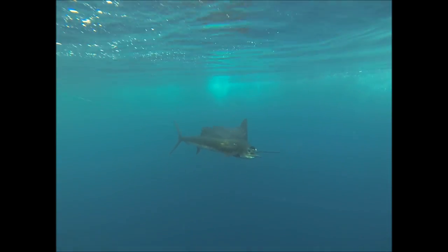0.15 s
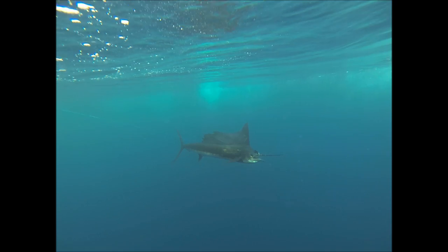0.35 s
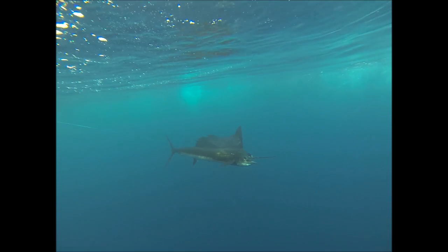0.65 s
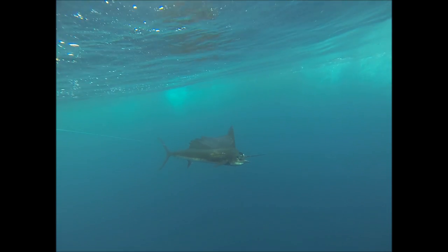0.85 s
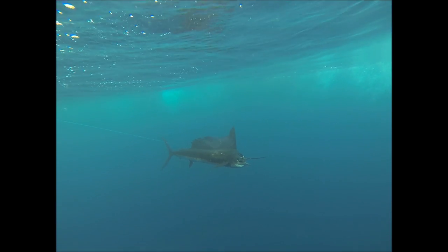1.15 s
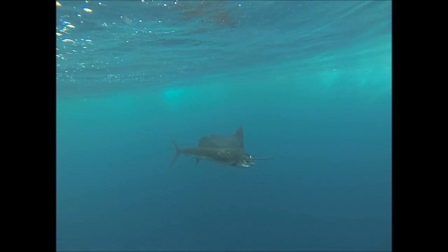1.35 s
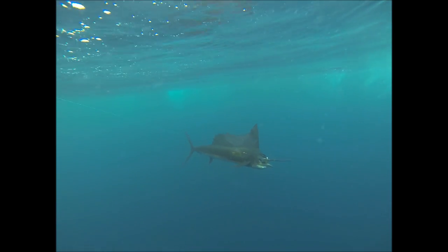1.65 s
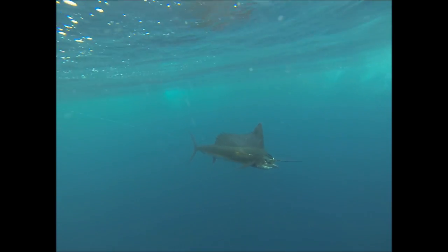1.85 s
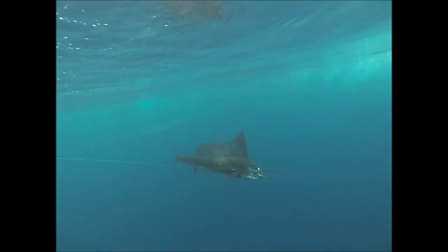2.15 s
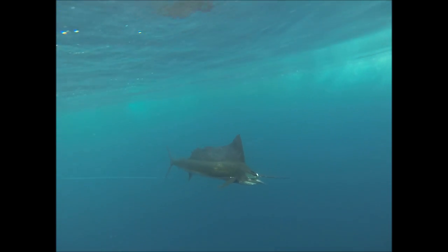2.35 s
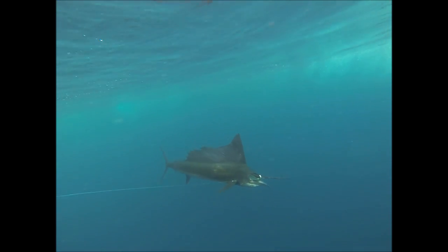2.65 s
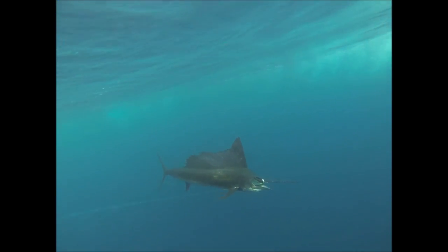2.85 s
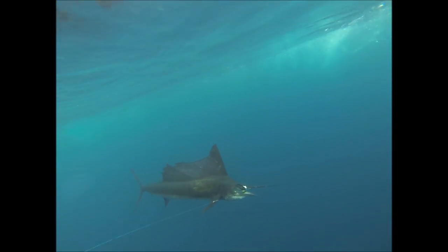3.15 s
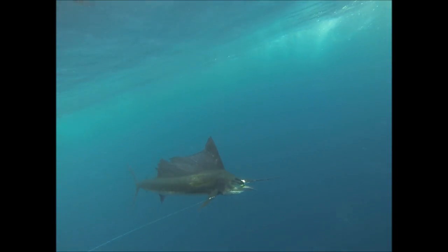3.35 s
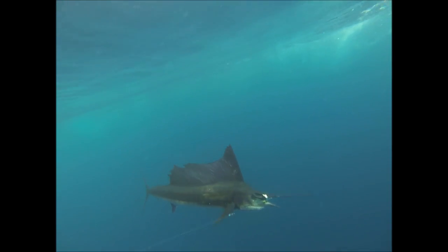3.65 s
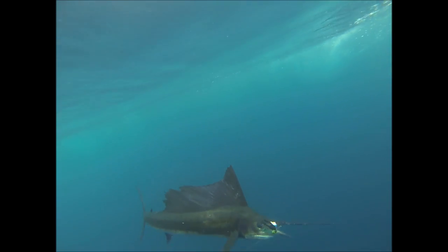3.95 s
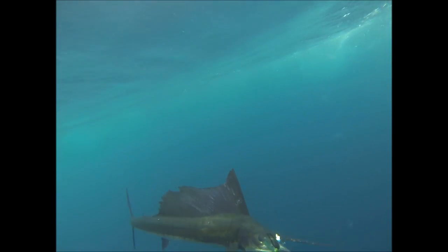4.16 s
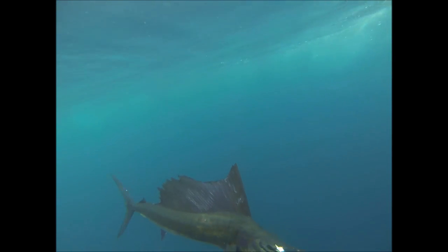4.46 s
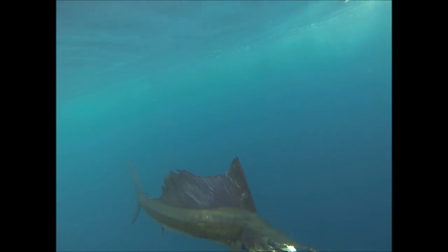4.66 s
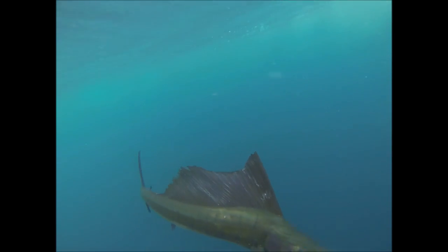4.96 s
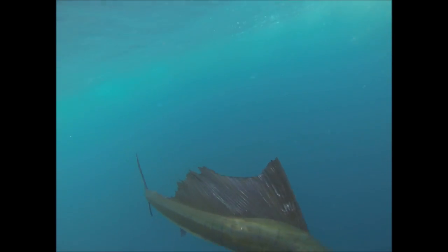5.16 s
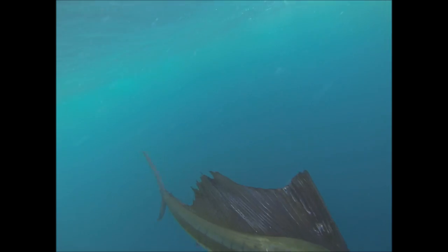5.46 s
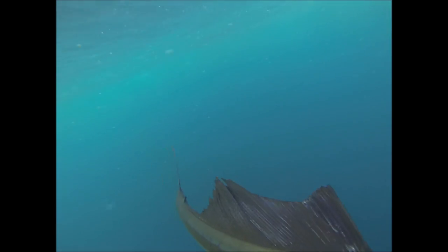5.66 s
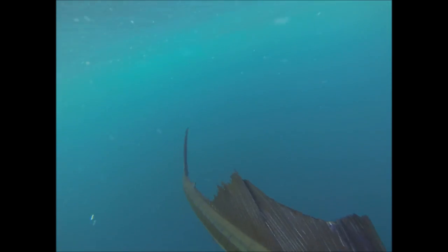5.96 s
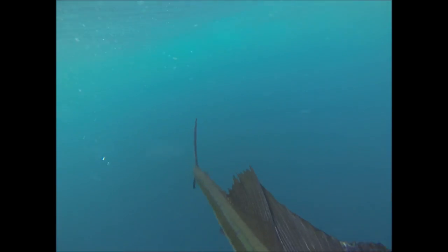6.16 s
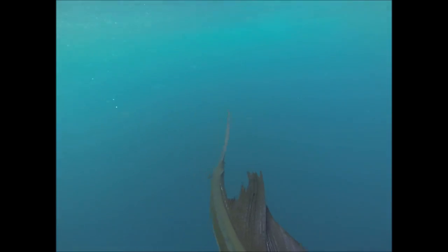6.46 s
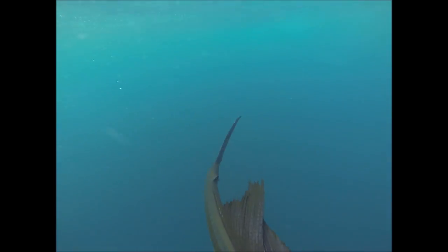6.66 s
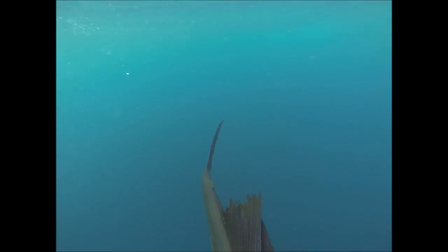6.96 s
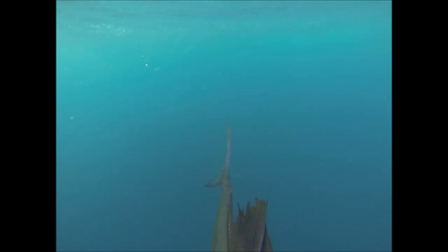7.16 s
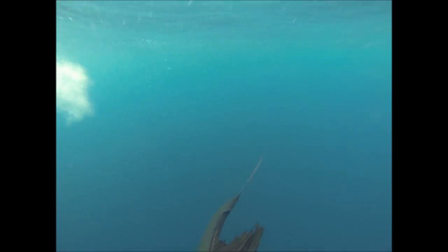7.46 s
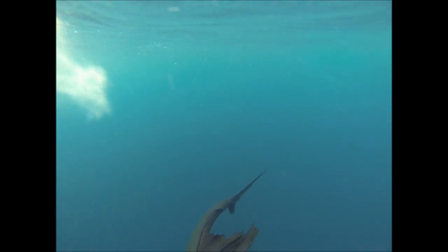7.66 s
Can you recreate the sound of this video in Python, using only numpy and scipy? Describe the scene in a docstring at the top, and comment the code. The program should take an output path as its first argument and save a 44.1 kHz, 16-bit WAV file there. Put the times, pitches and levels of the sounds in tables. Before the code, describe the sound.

A close, boxy underwater perspective near a sailfish, though the sounds belong to water, boat and camera housing. Low rumble and engine throb dominate the first half, with small ticks, passing fizz and breathy line singing. A cluster of quick thuds with climbing rings interrupts. Then scattered taps lead into churning froth, ringing bubbles, hard knocks and a booming surge around six seconds, continuing busily to the end.

```python
"""A camera in a sealed housing is towed just under the sea surface behind a boat.
At first noise rumbles on the case, an engine of wavering orders drones and slows, and the strained rig ticks.
Patches of coloured fizz sweep by with a low burble of bubbles, while breathy partials make the tow line sing.
The ticks return, then an air pocket rattles on the case in thuds and climbing rings.
At last bubbles and crackle churn, knocks ring the walls, surges slap and boom, and a speck ticks on the lens."""
import sys
import numpy as np
from scipy import signal
from scipy.fft import rfft, irfft, next_fast_len
from scipy.io import wavfile
from scipy.ndimage import uniform_filter1d, minimum_filter1d

SR = 44100
rng = np.random.default_rng(int(sys.argv[2]) if len(sys.argv) > 2 else 0)


def wrap_up_sound(samples):
    """Save the sound to the file named by the first command line argument, as 16-bit audio."""
    columns = np.atleast_2d(samples).T
    # keep every value between -1 and 1, then stretch to whole-number steps
    tamed = np.clip(columns, -1, 1)
    steps = np.round(tamed * 32767).astype(np.int16)
    wavfile.write(sys.argv[1], SR, steps)


N = 344421
TIME = np.arange(N) / SR

# Flow past the case, before trims: time_s, eddy_rumble_db, wall_rush_db
FLOW = [(0, -57, -42), (.15, -42.5, -42), (.52, -39.5, -42.5), (.64, -32.5, -39), (.9, -34.5, -39.5),
        (1.55, -31.5, -46), (2.2, -30, -42), (3.2, -34, -43), (3.72, -30, -36.5), (4.2, -37.5, -42),
        (4.55, -34, -39), (5.45, -35, -37.5), (6.05, -41, -46), (6.55, -46, -42.5), (7.15, -37, -37.5),
        (7.81, -46, -45.5)]
# Swaying of the rig: time_s, level_db
SWAY = [(0, -32), (.5, -28), (.9, -34), (1.95, -33), (2.25, -18.5), (2.9, -32), (3.3, -12), (4.25, -13),
        (5.5, -22.5), (7.81, -27.5)]
# Bass drone, the reference for engine and largest eddies: time_s, level_db
DRONE = [(0, -37.5), (.4, -44), (1.0, -28), (2.15, -19.5), (2.5, -25.5), (3.65, -17), (4.15, -20.5),
         (4.6, -12.5), (5.4, -25), (5.65, -31.5), (6.6, -41), (7.3, -38.5), (7.81, -43)]
ENGINE_DB, DEEP_DB = -4, -7.5  # each relative to the drone
# Tugs on the tow line that briefly heave the rig: time_s, sway_db, large_eddies_db
TUGS = [(5.77, -19.5, -30), (6.21, -17, -31), (7.4, -15.5, -48)]
TUG_SPREAD_S = 0.056  # standard deviation of the swell
# Colour of the swaying: frequency_hz, relative_db_per_hz
BUFFET_COLOUR = [(5, -30), (10, -7.5), (15, -1.5), (22, -15), (35, -21), (60, -54.5)]
# Colour of the largest eddies: frequency_hz, relative_db_per_hz
DEEP_COLOUR = [(22, -12.5), (38, -7), (65, 2.5), (90, -4), (120, -10.5), (200, -28), (400, -59.5)]
# Colour of the rumbling eddies: frequency_hz, relative_db_per_hz
EDDY_COLOUR = [(60, -20), (105, -3.5), (148, 6), (185, -2.5), (220, -1), (300, -8.5), (400, -14),
               (500, -19), (700, -25), (1200, -53.5)]
# Colour of the rush that rings the walls: frequency_hz, relative_db_per_hz
RUSH_COLOUR = [(200, -33.5), (400, -5), (540, -0.5), (600, 6), (660, -2.5), (740, -2), (850, -13.5),
               (1000, -27), (1500, -41), (3000, -57.5)]

# Engine speed: time_s, turns_per_s
ENGINE_SPEED = [(0, 42), (1.5, 22.7), (2.15, 25.9), (2.7, 30.2), (3.3, 25.4), (3.9, 27), (4.25, 26.3),
                (4.6, 28), (4.85, 26.2), (5.1, 19.9), (5.4, 19.9), (6.4, 16.6), (7.81, 26.8)]
# How well each engine pitch reaches the case: frequency_hz, relative_db
ENGINE_PATH = [(42, -25), (55, 1), (66, 2), (82, 4), (95, -9.5), (110, -2.5), (135, -19.5), (165, -23.5),
               (210, -33)]
# Balance of upper against lower engine orders: time_s, tilt_db_per_octave
ENGINE_TILT = [(2.2, 2.5), (3.0, -1.5), (3.7, -3.5), (4.68, 4.5), (5.0, -3), (6.5, -1.5)]

# Patches of fizzing wake: nearest_s, fizz_db, finest_spray_db, spread_s (standard deviation)
WAKE = [(0.16, -53.5, -72.5, 0.49), (0.828, -34.5, -63.5, 0.13), (1.057, -46, -66.5, 0.12),
        (1.503, -53.5, -67, 0.18)]
# Colour of the fizz: frequency_hz, relative_db_per_hz
FIZZ_COLOUR = [(150, 1), (340, 17.5), (480, 12), (700, 8.5), (1100, -6.5), (1380, -10.5), (1600, 6),
               (2000, 0), (2400, -1), (2680, -13), (2950, 4), (3180, -7), (3500, 0.5), (3720, -14.5),
               (4000, -9.5), (4400, -22.5), (5500, -42), (9000, -57)]
# Colour of the finest spray: frequency_hz, relative_db_per_hz
SPRAY_COLOUR = [(3500, -12), (4620, 2.5), (4830, -6), (5150, 9), (5520, -11), (5880, 0), (6250, -7),
                (6650, 5), (7400, -7.5), (8100, 0.5), (9000, -22), (10300, -11), (14000, -28)]

# Churning water, before its trim: time_s, level_db
CHURN = [(1.9, -58), (3.18, -60.5), (3.61, -57), (4.35, -56), (5.54, -46), (5.82, -48), (6.26, -41.5),
         (6.77, -47), (7.15, -38), (7.41, -38.5), (7.81, -50)]
# Colour of froth heard through the walls: frequency_hz, relative_db_per_hz
FROTH_COLOUR = [(330, -15.5), (480, 4.5), (740, 5.5), (1020, -1), (1200, 5), (1430, -2), (1620, 8.5),
                (1800, 0), (2020, -3), (2320, -5), (2720, -23.5), (2950, -19), (3500, -28.5), (4400, -36),
                (6500, -42.5), (10000, -47.5), (15000, -60)]

# The tow line sings as the wake passes: time_s, pitch_hz, relative_db
SONG = [(.7, 468, -60), (.86, 530, -49), (.95, 589, -46.5), (1.05, 640, -52.5), (1.27, 666, -64),
        (1.48, 702, -57), (1.64, 717, -63), (1.9, 710, -87.5)]
# Partials of the song: multiple_of_pitch, relative_db
SONG_PARTIALS = [(2, -3), (3, 0), (5, -11), (6, -17)]
# Two thin whistles that climb above it, one curve each: time_s, pitch_hz, level_db
WHISTLES = [
    [(.95, 6300, -110), (1.09, 6630, -68), (1.17, 6750, -68), (1.35, 7050, -110)],
    [(1.1, 5600, -110), (1.23, 5760, -71), (1.43, 6090, -70.5), (1.55, 6250, -77), (1.75, 6350, -74),
     (2.05, 6400, -110)],
]

# Colour of the steady hiss: frequency_hz, relative_db_per_hz
HISS_COLOUR = [(1000, 1.5), (3000, 1.5), (4500, -4.5), (8000, -9.5), (11000, -11.5), (14000, -20),
               (16000, -29)]
HISS_DB = -67.5

# Modes of the case walls: frequency_hz, relative_db, t60_s
HOUSING = [(467.4, 1, 0.16), (715, 8, 0.043), (1130, -6.5, 0.07), (1360, -3, 0.028), (1400, -4, 0.013),
           (1573, -0.5, 0.044), (1850, -5, 0.045), (2196, -5.5, 0.032), (2570, -8, .016), (3010, -9, 0.02),
           (3554, -5.5, 0.012), (3730, -8.5, 0.0056), (5100, -27.5, .004), (6440, -16.5, 0.0065)]
CASE_HZ, WALL_CUT_HZ = 1560, 3860  # main resonance of the case; top of what its walls pass
# The rig creeps under strain and ticks: start_s, peak_db
TICKS = [(.018, -30), (.041, -36.5), (.056, -29.5), (.094, -32.5), (.126, -26.5), (.149, -35), (0.223, -34),
         (.244, -37), (.257, -29.5), (0.293, -30), (.339, -25.5), (3.256, -37), (3.293, -37),
         (3.332, -36.5)]
TICK_LOW_HZ, TICK_HIGH_HZ = 525, 3200

# Surges that slap the case: centre_s, spray_rms_db (at the height), spread_s (standard deviation)
SURGES = [(.15, -48, 0.027), (5.445, -41, 0.051), (5.554, -37.5, 0.012), (6.133, -23, 0.0082),
          (6.187, -18, 0.015), (6.899, -29, 0.0097), (7.061, -25, 0.0069), (7.247, -32.5, 0.015),
          (7.339, -27, 0.012)]
# Boom of the rig under the heaviest surge: frequency_hz, peak_db, t60_s
BOOM = [(72.2, -11.5, 0.26), (153, -13, 0.18), (226, -15.5, 0.16), (279, -16, 0.09), (468, -20.5, 0.057)]
BOOM_S = 6.166

# Ringing bubbles, low and high, and the clear high rings that follow some taps:
# start_s, ring_peak_db, pitch_hz
RINGS = [(.152, -28, 597), (.163, -37, 850), (.553, -36, 540), (0.624, -21, 171.5), (.779, -27, 224),
         (.935, -23, 196), (1.123, -22, 123), (3.649, -38, 3410), (3.943, -46.5, 3530),
         (4.1775, -18.5, 3610), (4.793, -30, 1750), (5.435, -22, 790), (5.436, -24, 1203),
         (5.48, -24.5, 674), (5.478, -36, 1740), (5.545, -35.5, 1494), (5.581, -28.5, 1140),
         (5.671, -34.5, 1520), (5.775, -21.5, 962), (5.8, -24.5, 1530), (5.859, -25, 1090),
         (5.948, -33, 1510), (5.966, -29, 912), (5.992, -29.5, 1670), (6.02, -39, 1950),
         (6.101, -13.5, 691), (6.113, -31, 3380), (6.125, -23, 1230), (6.139, -26, 1560), (6.184, -27, 693),
         (6.2, -35, 3570), (6.314, -27.5, 1782), (6.435, -31, 1525), (6.884, -22.5, 1134),
         (6.896, -17, 1590), (6.926, -21, 1740), (6.993, -26, 738), (6.994, -22, 2290),
         (7.021, -23.5, 1625), (7.042, -26, 1800), (7.059, -17, 1795), (7.075, -25, 566), (7.09, -31, 1610),
         (7.113, -27, 1560), (7.137, -28, 1530), (7.15, -31, 1288), (7.221, -29, 1520),
         (7.251, -23.5, 1530), (7.274, -19, 1556), (7.328, -24.5, 760), (7.344, -19, 1565),
         (7.335, -25, 1067), (7.461, -29, 705), (7.555, -18, 712), (7.587, -14.5, 1614), (7.644, -32, 1642)]
RING_T60_S, RING_SHORTENS = 0.057, 0.67  # ring time at 1 kHz; power by which it falls with pitch

# Knocks and taps on the case: start_s, peak_db, contact_centre_hz, reach_factor (below and above)
TAPS = [(.769, -25.5, 790, 2.1), (.877, -25, 644, 1.5), (3.369, -43, 1400, 1.8), (3.43, -44, 1400, 1.25),
        (3.647, -25, 1990, 1.9), (3.722, -36, 1193, 1.28), (3.766, -37, 5280, 1.18),
        (3.809, -48, 6000, 1.1), (4.178, -11.5, 3610, 1.25), (4.906, -30.5, 2180, 1.32),
        (4.983, -29.5, 2130, 1.32), (5.107, -36, 2600, 2.1), (5.156, -30, 2110, 1.2),
        (5.188, -33, 1800, 1.8), (5.298, -36, 2600, 1.6), (5.384, -18.5, 1054, 1.5),
        (5.622, -30.5, 2095, 1.8), (5.705, -37, 2600, 1.5), (5.836, -23.5, 1390, 1.73),
        (5.959, -23.5, 2040, 1.47), (5.995, -23, 2200, 1.1), (6.07, -41, 1700, 1.5),
        (6.096, -8.5, 990, 1.3), (6.266, -29, 1400, 1.35), (6.334, -37, 2500, 1.26),
        (6.368, -25.5, 1580, 1.27), (6.424, -22, 2050, 1.37), (6.474, -25.5, 1800, 1.4),
        (6.628, -24, 1094, 1.68), (6.661, -19.5, 1348, 2.3), (6.714, -26.5, 1780, 1.33),
        (6.788, -25, 1430, 1.55), (6.844, -33, 1190, 2), (6.926, -16.5, 1190, 1.21),
        (6.993, -14, 1323, 1.6), (7.097, -36.5, 2700, 1), (7.18, -28, 1920, 2), (7.423, -25.5, 1500, 1.7),
        (7.51, -29.5, 2790, 1.23), (7.574, -24.5, 2380, 1.7), (7.663, -24.5, 1520, 1.25)]

BURBLE_S, BURBLE_HALF_S = 1.06, 0.28  # middle and half-length of the low burble
BURBLE_DB, BURBLE_EDGE_DB = -27, 7  # highest bubble peak; drop towards both ends

# Air pocket knocking on the case: start_s, thud_db, low_ring_hz, low_ring_db, high_ring_hz, high_ring_db
# (levels before the shared low-pass)
REBOUNDS = [(4.0962, 3.5, 720, 0, 1754, -4), (4.1092, -5, 760, -6.5, 2000, -22),
            (4.120, -12, 930, -16, 2320, -20), (4.134, -14, 1150, -15.5, 2360, -22),
            (4.1527, -15, 1275, -14.5, 2300, -24)]
THUD_HZ, THUD_T60_S = 1460, 0.0075
LOW_T60_S, HIGH_T60_S, REBOUND_TOP_HZ = 0.03, 0.032, 3600

PIPS_START_S = 4.5  # bubbles burst on the case from here on
PIP_DB, PIP_FOLLOWS = -48, 0.6  # base level in the wildest water; share of the churn's swing in dB
HUM_HZ, HUM_DB = 150.4, -6.5  # low resonance of the rig; level relative to the top of the CHURN curve

# Modes of the lens window: frequency_hz, relative_db, t60_s
WINDOW = [(3480, -6, .017), (3850, -10, .008), (8600, -10, .004), (10300, -13, .004), (12400, 0, .0035),
          (13300, -8, .003)]
SPECK_S, SPECK_DB = 7.6135, -11.5  # start and peak of the speck's tick
CUTOFF_HZ = 15200


def from_db(db):
    """Decibels to gain."""
    return 10 ** (np.asarray(db) / 20)


def rms_one(x):
    """Scale to unit rms."""
    return x / np.sqrt(np.mean(x ** 2) + 1e-20)


def in_time(rows):
    """Each column of a curve at every sample."""
    s, *columns = np.transpose(rows)
    return [np.interp(TIME, s, column) for column in columns]


def passing(s, spread_s):
    """A smooth bell-shaped rise and fall around a moment; peak 1."""
    return np.exp(-0.5 * ((TIME - s) / spread_s) ** 2)


def drift(per_s):
    """Slow chance, per_s new values a second, with a spread of about 1."""
    return np.interp(TIME * per_s, np.arange(4096), rng.standard_normal(4096))


def coloured(x, spectrum):
    """Filter a whole-length signal by a colour; rms 1."""
    hz, db = np.transpose(spectrum)
    size = next_fast_len(N)
    bins = np.maximum(np.arange(size // 2 + 1) * SR / size, 1)
    gain = from_db(np.interp(np.log(bins), np.log(hz), db))
    # roll off beyond both ends of the colour
    gain = gain * np.minimum(bins / hz[0], 1) * np.minimum(hz[-1] / bins, 1) ** 2
    return rms_one(irfft(rfft(x, size) * gain, size)[:N])


def noise(spectrum):
    """Noise of a given colour; rms 1."""
    return coloured(rng.standard_normal(N), spectrum)


def narrow(hz, width_hz):
    """A breathy tone that follows a pitch; rms 1."""
    angle = 2 * np.pi * np.cumsum(hz) / SR
    return rms_one(drift(width_hz) * np.sin(angle) + drift(width_hz) * np.cos(angle))


def add(out, s, sound):
    """Mix a short sound in at a time."""
    start = int(np.clip(round(s * SR), 0, N - 1))
    out[start:start + len(sound)] += sound[:N - start]


def damped(hz, t60, glide=0):
    """A dying sine whose pitch has risen by the share glide after one t60."""
    t = TIME[:int(1.5 * t60 * SR) + 2]
    phase = 2 * np.pi * hz * t * (1 + glide * t / (2 * t60))
    return np.sin(phase) * np.exp(-np.log(1000) * t / t60)


def swelling(sound, rise_s):
    """Soften the onset of a ring; peak 1."""
    soft = sound * (1 - np.exp(-(TIME[:len(sound)] / rise_s) ** 2))
    return soft / (np.abs(soft).max() + 1e-12)


def bubble(hz, t60, glide, rise_cycles=1.6):
    """A bubble swells over its first cycles, then dies while its pitch rises."""
    return swelling(damped(hz, t60, glide), rise_cycles / hz)


def crackle(per_s=1500, size_db=5.0, lumpy_db=3.0):
    """Countless tiny collapses, heard through the walls; rms 1."""
    born = rng.random(N) < per_s / SR
    level_db = size_db * np.minimum(rng.exponential(1, N), 3) + lumpy_db * drift(70)
    return coloured(born * from_db(level_db) * rng.choice([-1, 1], N), FROTH_COLOUR)


def swarm(count, size_db=4.0, cycles=27, glide=0.016, clump_s=0.012, rise_cycles=2.4):
    """Clumps of short and long bubbles, a few much louder than the rest, heard through the walls; rms 1."""
    out = np.zeros(N)
    for clump in rng.random((count, 4, 4)):
        s, burst = clump[0, 0] * N / SR, clump[0, 1]
        clump_size = min(-np.log(1 - burst), 3)
        for delay, pitch, size, life in clump[1:]:
            hz = 520 * (3900 / 520) ** pitch
            t60 = cycles * 2 ** (2.0 * life - 0.75) / hz
            strength = from_db(size_db * (clump_size + 2 * size)) * hz
            add(out, s + clump_s * delay, strength * bubble(hz, t60, glide, rise_cycles))
    return coloured(out, FROTH_COLOUR)


def contact(sound, low_hz, high_hz):
    """Keep the band that a contact excites; peak 1."""
    band = signal.butter(2, [low_hz, high_hz], "band", fs=SR, output="sos")
    kept = signal.sosfilt(band, sound)
    return kept / np.abs(kept).max()


def strike(low_hz, high_hz, crack_db, crack_reach, vary_db=3.5, crack_t60=0.012):
    """A contact gives a short crack and rings the shared walls; a harder one reaches higher modes."""
    t = TIME[:SR // 10]
    luck = rng.standard_normal(len(HOUSING))
    ring = np.zeros(len(t))
    for k, (hz, mode_db, t60) in enumerate(HOUSING):
        gain = (-1) ** k * from_db(mode_db + vary_db * luck[k])  # neighbours in opposite polarity
        ring += gain * np.sin(2 * np.pi * hz * t) * np.exp(-np.log(1000) * t / t60)
    burst = rng.standard_normal(len(t)) * np.exp(-np.log(1000) * t / crack_t60)
    # two passes make the crack's edges steeper
    crack = contact(burst, low_hz / 2, 2 * crack_reach * high_hz)
    crack = contact(crack, low_hz / 2, crack_reach * high_hz)
    return contact(ring, low_hz, high_hz) + from_db(crack_db) * crack


def through_walls(sound, top_hz, leak_db=-17):
    """The case lets little through above its highest strong mode; peak 1."""
    walls = signal.butter(8, max(top_hz, WALL_CUT_HZ), fs=SR, output="sos")
    kept = signal.sosfilt(walls, sound) + from_db(leak_db) * sound
    return kept / np.abs(kept).max()


def flow(flutter_db=2.5, eddy_gain_db=-2.0, rush_gain_db=0.5):
    """Large eddies shake the case, with short extra heaves when the line tugs; smaller ones ring its walls."""
    eddy_db, rush_db = in_time(FLOW)
    (sway_db,), (drone_db,) = in_time(SWAY), in_time(DRONE)
    sway, deep = from_db(sway_db), from_db(drone_db + DEEP_DB)
    for s, tug_sway_db, tug_deep_db in TUGS:
        tug = passing(s, TUG_SPREAD_S)
        sway = sway + from_db(tug_sway_db) * tug
        deep = deep + from_db(tug_deep_db) * tug
    buffet = sway * noise(BUFFET_COLOUR) + deep * noise(DEEP_COLOUR)
    eddies = from_db(eddy_db + eddy_gain_db + flutter_db * drift(25)) * noise(EDDY_COLOUR)
    rush = from_db(rush_db + rush_gain_db + flutter_db * drift(40)) * noise(RUSH_COLOUR)
    return buffet + eddies + rush


def engine(wander=0.006, throb_db=4.0):
    """Low orders of the turning engine waver, and slide through the resonances of their path as it slows."""
    (speed,), (drone_db,), (tilt_db,) = in_time(ENGINE_SPEED), in_time(DRONE), in_time(ENGINE_TILT)
    angle = 2 * np.pi * np.cumsum(speed * (1 + wander * drift(12))) / SR
    orders = np.zeros(N)
    for k in range(2, 9):
        path_db = np.interp(k * speed, *np.transpose(ENGINE_PATH))
        db = path_db + throb_db * drift(7) + tilt_db * np.log2(k / 3)  # tilt pivots on order 3
        orders += from_db(db) * np.sin(k * angle + rng.uniform(0, 2 * np.pi))
    return from_db(drone_db + ENGINE_DB) * rms_one(orders)


def wake(flicker_db=2.6):
    """Patches of fizz sweep by with a finer spray above, flickering together."""
    fizz = sum(from_db(db) * passing(s, spread) for s, db, _, spread in WAKE)
    spray = sum(from_db(db) * passing(s, spread) for s, _, db, spread in WAKE)
    patches = fizz * noise(FIZZ_COLOUR) + spray * noise(SPRAY_COLOUR)
    return from_db(flicker_db * drift(60.53)) * patches


def churn(smooth_db=-15, crackle_db=-9, level_db=2.0, cluster_db=1.75):
    """Air breaks up into bubbles and crackle, over a faint smooth wash."""
    (churn_db,) = in_time(CHURN)
    # the bubbles stand out only once the water is stirred up
    stirred = np.interp(TIME, [4.7, 5.2], [0.12, 1])
    grains = swarm(count=900, size_db=2.5, cycles=41, rise_cycles=2.8) + from_db(crackle_db) * crackle()
    grains = grains * from_db(cluster_db * drift(30))
    wash = np.hypot(from_db(smooth_db), 0.82 * (1 - stirred)) * noise(FROTH_COLOUR)
    return from_db(churn_db + level_db) * (stirred * grains + wash)


def singing_line(song_width_hz=100, whistle_width_hz=330):
    """Eddies shed by the line make a hollow rising tone and thin whistles."""
    pitch, song_db = in_time(SONG)
    song = np.zeros(N)
    for k, db in SONG_PARTIALS:
        song += from_db(db) * narrow(k * pitch, song_width_hz * k / 2)
    whistles = np.zeros(N)
    for curve in WHISTLES:
        hz, db = in_time(curve)
        whistles += from_db(db) * narrow(hz, whistle_width_hz)
    return from_db(song_db) * song + whistles


def hiss():
    """A faint, steady bed of coloured noise."""
    return from_db(HISS_DB) * noise(HISS_COLOUR)


def ticks():
    """The strained rig slips in short, gritty steps."""
    out = np.zeros(N)
    for s, db in TICKS:
        slip = strike(TICK_LOW_HZ, TICK_HIGH_HZ, crack_db=-6.5, crack_reach=0.82, crack_t60=0.022)
        add(out, s, from_db(db) * through_walls(slip, WALL_CUT_HZ))
    return out


def surges(rise_s=0.012, heave_db=-19, heave_s=0.016):
    """Masses of frothy water hit the case; the heaviest heaves against it and makes the rig boom."""
    swell = sum(from_db(db) * passing(s, spread) for s, db, spread in SURGES)
    froth = rms_one(swarm(count=2600, size_db=2.5) + from_db(-2.0) * crackle(per_s=5000, lumpy_db=2.5))
    age = np.maximum(TIME - BOOM_S, 0) / heave_s
    heave = from_db(heave_db) * age * np.exp(1 - age) * noise(EDDY_COLOUR)
    out = swell * froth + heave
    for hz, db, t60 in BOOM:
        add(out, BOOM_S, from_db(db) * swelling(damped(hz, t60), rise_s))
    return out


def rings(rise_s=0.0013, build_s=0.0026, near_octaves=0.26, glide=0.041, puff_db=-16, puff_s=0.0043):
    """Bubbles and some taps ring, each with a puff of crackle; near the case resonance they build up slowly."""
    out, puffs = np.zeros(N), np.zeros(N)
    age = TIME[:SR // 20] / puff_s
    puff = age * np.exp(1 - age)
    for s, db, hz in RINGS:
        kilohertz = hz / 1000
        t60 = RING_T60_S / kilohertz ** RING_SHORTENS
        nearness = np.exp(-(np.log2(hz / CASE_HZ) / near_octaves) ** 2)
        rise = rise_s + build_s * nearness
        add(out, s, from_db(db) * bubble(hz, t60, glide, rise * hz))
        add(puffs, s, from_db(db + puff_db) * min(kilohertz, 1) ** 2 * puff)
    return out + puffs * crackle()


def taps():
    """Single taps of the rig and of bursting bubbles ring the case walls."""
    out = np.zeros(N)
    for s, db, hz, reach in TAPS:
        reach = max(reach, 1.05)
        knock = strike(hz / reach, hz * reach, crack_db=-7.5, crack_reach=0.74, crack_t60=0.022)
        add(out, s, from_db(db) * through_walls(knock, hz * reach * 1.24))
    return out


def burble(count=44, low_hz=170, high_hz=410, size_db=6, cycles=20, glide=0.19):
    """Big slow bubbles wobble past behind the thickest patch of wake, loudest in its middle."""
    out = np.zeros(N)
    for k, (when, pitch, size) in enumerate(rng.random((count, 3))):
        place = 2 * (k + when) / count - 1  # from -1 to 1 along the burble
        hz = low_hz * (high_hz / low_hz) ** pitch
        db = BURBLE_DB - size_db * size - BURBLE_EDGE_DB * place ** 2
        add(out, BURBLE_S + BURBLE_HALF_S * place, from_db(db) * bubble(hz, cycles / hz, glide))
    return out


def rebounds(rise_s=0.00074, walls_db=-20):
    """Each rebound is a short thud that shakes the walls, and two rings, weaker overall as they climb."""
    out = np.zeros(N)
    for s, thud_db, low_hz, low_db, high_hz, high_db in REBOUNDS:
        walls = strike(2500, 4600, crack_db=-12, crack_reach=1.0)
        add(out, s, from_db(thud_db) * swelling(damped(THUD_HZ, THUD_T60_S), rise_s))
        add(out, s, from_db(thud_db + walls_db) * walls)
        # the rings start in the opposite polarity to the thud
        add(out, s, -from_db(low_db) * damped(low_hz, LOW_T60_S))
        add(out, s, -from_db(high_db) * damped(high_hz, HIGH_T60_S))
    return signal.sosfilt(signal.butter(3, REBOUND_TOP_HZ, fs=SR, output="sos"), out + 1e-18)


def snaps(per_s=16, size_db=2.5, level_db=-3, low_hz=1800, high_hz=5500):
    """Bubbles that burst right on the case give fine, sharp clicks."""
    (churn_db,) = in_time(CHURN)
    born = (rng.random(N) < per_s / SR) & (TIME > PIPS_START_S)
    clicks = born * from_db(churn_db + level_db + size_db * np.minimum(rng.exponential(1, N), 3))
    click = strike(low_hz, high_hz, crack_db=-5.5, crack_reach=0.87, crack_t60=0.019)
    return signal.fftconvolve(clicks, click)[:N]


def pips(count=30, size_db=1.0, cycles=42, fall_db_per_octave=-9):
    """Tiny bubbles grow louder with the churn, mostly near the upper modes of the case."""
    out = np.zeros(N)
    (churn_db,) = in_time(CHURN)
    level_db = PIP_DB + PIP_FOLLOWS * (churn_db - churn_db.max())
    for when, mode, detune, size in rng.random((count, 4)):
        s = PIPS_START_S + when * (TIME[-1] - PIPS_START_S)
        # most pitches fall in the two bands 3200-3850 and 6300-6800 Hz
        hz = np.interp(mode, [0, 0.6, 0.63, 0.88, 1], [3200, 3850, 6300, 6800, 10500])
        hz = hz * (0.96 + 0.08 * detune)
        db = level_db[int(s * SR)] + size_db * min(-np.log(1 - size), 3)
        db = db + fall_db_per_octave * np.log2(hz / 3400)
        add(out, s, from_db(db) * bubble(hz, cycles / hz, 0.01, rise_cycles=4.8))
    return out


def hum(width_hz=30, follows=0.76):
    """Once the water is stirred up it keeps the rig humming at its low resonance."""
    (churn_db,) = in_time(CHURN)
    stirred = np.interp(TIME, [5.4, 5.8], [0, 1])
    level_db = HUM_DB + churn_db.max() + follows * (churn_db - churn_db.max())
    return stirred * from_db(level_db) * narrow(np.full(N, HUM_HZ), width_hz)


def speck(rise_s=0.00014):
    """A hard speck strikes the lens window, whose short modes make one bright tick."""
    out = np.zeros(N)
    for hz, db, t60 in WINDOW:
        add(out, SPECK_S, from_db(db) * swelling(damped(hz, t60), rise_s))
    return from_db(SPECK_DB) * out / np.abs(out).max()


def scene():
    """Everything reaches one microphone inside the case."""
    bed = flow() + engine() + wake() + churn() + singing_line() + hiss()
    early = ticks() + surges() + rings() + taps() + burble()
    late = rebounds() + snaps() + pips() + hum() + speck()
    return (bed + early + late)[None]


def record(dry):
    """A fast limiter holds the hardest knocks; the top is cut steeply."""
    room = np.minimum(1, 0.89 / (np.abs(dry) + 1e-9))
    lowest = minimum_filter1d(room, size=301, axis=-1)
    gain = uniform_filter1d(lowest, size=301, axis=-1)
    top_cut = signal.ellip(10, 0.1, 90, CUTOFF_HZ, fs=SR, output="sos")
    return signal.sosfilt(top_cut, dry * gain)


dry = scene()
out = record(dry)
wrap_up_sound(out)
```